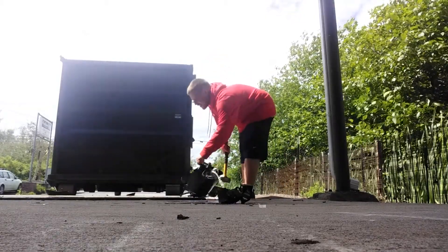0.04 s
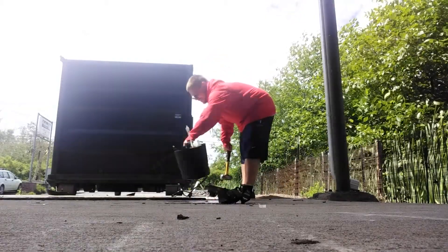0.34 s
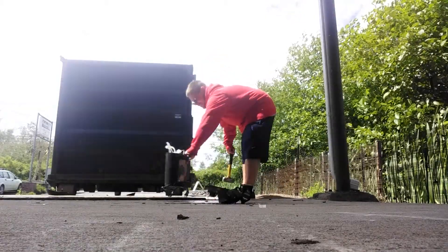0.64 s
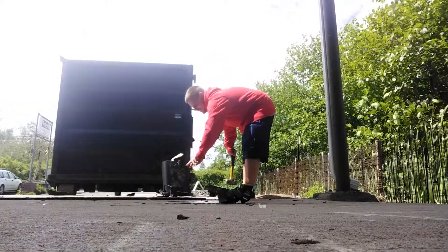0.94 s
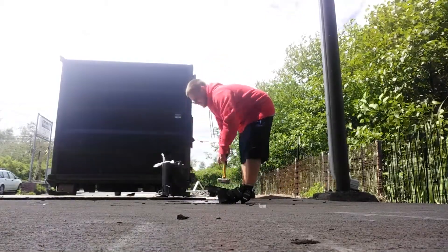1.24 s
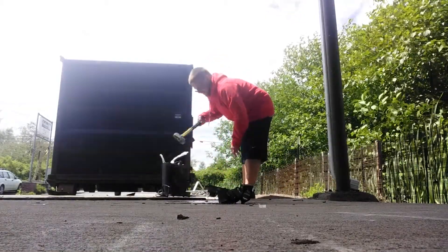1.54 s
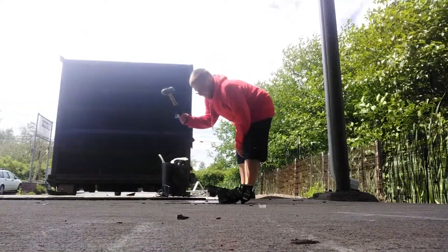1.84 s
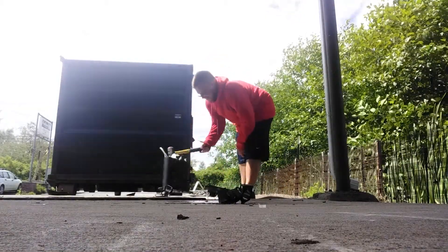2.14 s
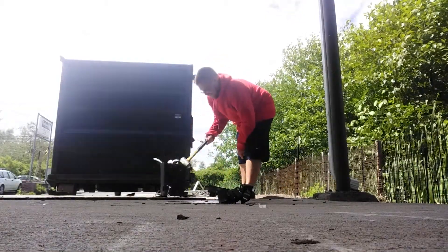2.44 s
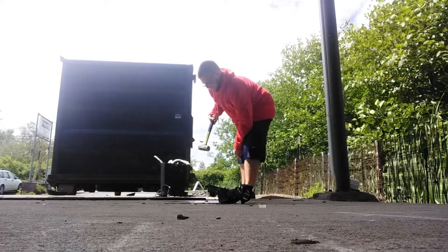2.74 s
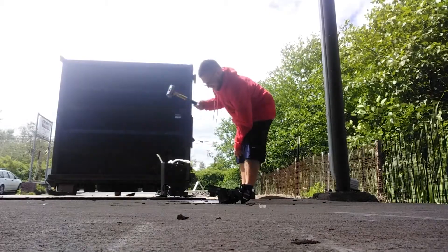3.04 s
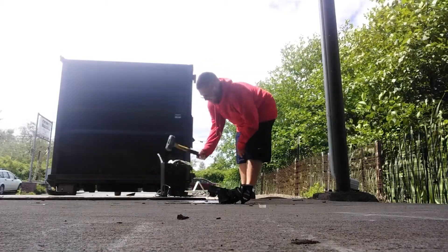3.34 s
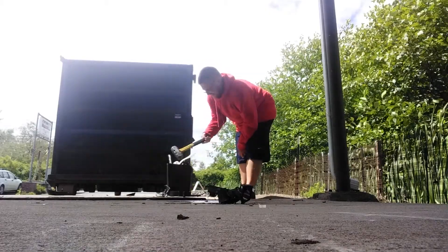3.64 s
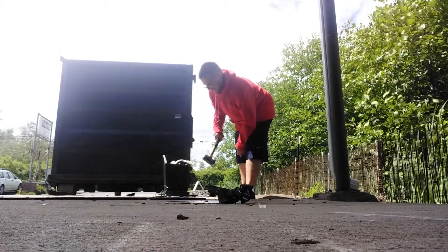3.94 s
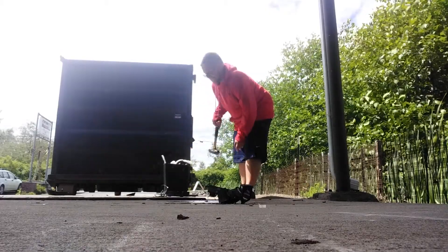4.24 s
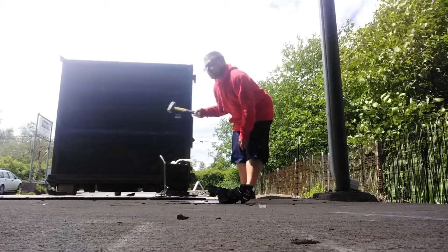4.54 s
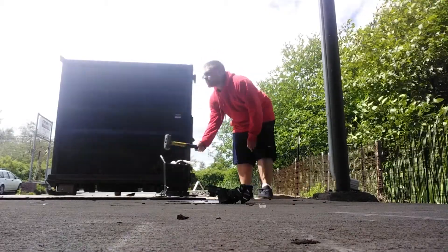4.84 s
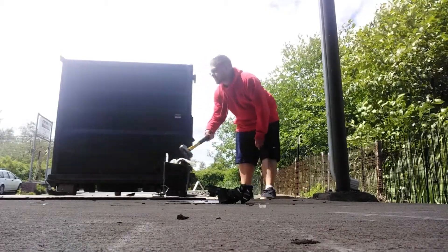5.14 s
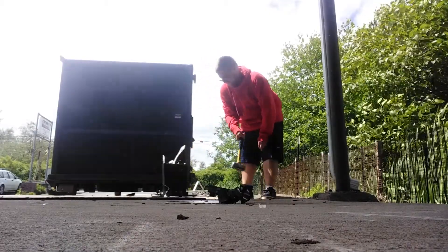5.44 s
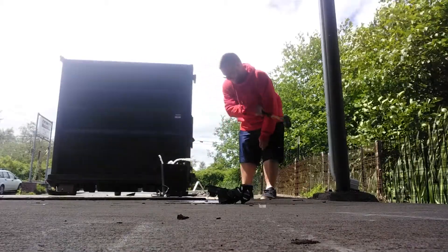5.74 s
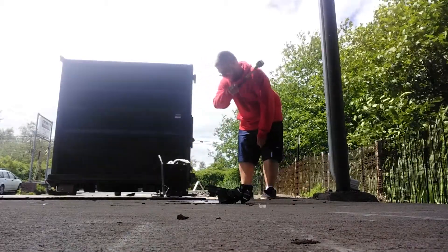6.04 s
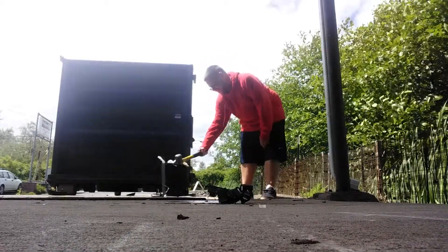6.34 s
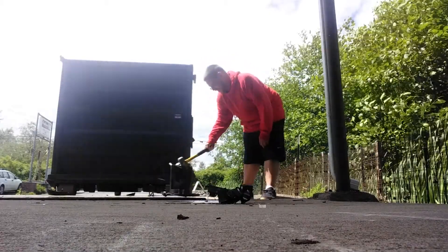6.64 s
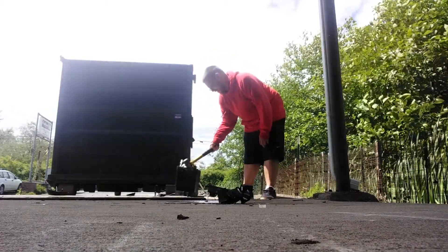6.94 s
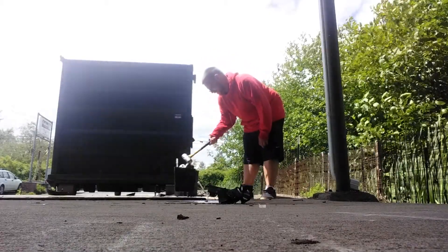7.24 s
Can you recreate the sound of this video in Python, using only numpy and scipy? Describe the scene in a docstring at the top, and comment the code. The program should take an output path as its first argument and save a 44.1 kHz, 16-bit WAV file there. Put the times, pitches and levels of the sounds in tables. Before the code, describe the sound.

Four sharp hammer blows crunch a plastic appliance outdoors, with hollow clunks and tinkling parts over the hum of passing cars.

```python
"""A plastic rattle dies away; then a coffee maker clunks down on asphalt and is tapped. Traffic rolls by.
A hammer strikes four times: the plastic shell crunches, the steel head pings and the machine thuds.
Between blows it rocks back with a hollow clunk and sheds bits; a steel skip and the yard walls echo.
Each blow turns the automatic volume down for about a second before the traffic swells back.
At the end, small parts tinkle and the machine settles as an engine draws nearer."""
import sys
import numpy as np
from scipy import signal
from scipy.fft import rfft, irfft, next_fast_len
from scipy.io import wavfile
from scipy.ndimage import uniform_filter1d, minimum_filter1d

SR = 44100
rng = np.random.default_rng(int(sys.argv[2]) if len(sys.argv) > 2 else 0)


def generate_wav(signal):
    """Clip the signal to [-1, 1] and save it as 16-bit WAV at the path in sys.argv[1]."""
    frames = np.transpose(np.atleast_2d(signal))
    scaled = np.clip(frames, -1, 1) * 32767
    pcm = np.round(scaled).astype(np.int16)
    wavfile.write(sys.argv[1], SR, pcm)


N = 329868
SIZE = 65536  # samples in one hit and its echoes
HZ = np.fft.rfftfreq(SIZE, 1 / SR)
T = np.arange(SIZE) / SR


def amp(db):
    """Turn decibels into a gain to multiply by."""
    return 10 ** (np.asarray(db) / 20)


def unit(x):
    """Scale a signal to an average (rms) strength of 1."""
    return x / np.sqrt(np.mean(x ** 2) + 1e-20)


def along(points, hz):
    """Read between (pitch_hz, value) points, spacing octaves evenly."""
    pitches, values = np.transpose(points)
    return np.interp(np.log(hz + 1), np.log(pitches + 1), values)


def add(track, start_s, x):
    """Mix one hit into the track."""
    start = max(0, round(start_s * SR))
    track[:, start:start + SIZE] += x[..., :N - start]


def filtered(x, response):
    """Scale each frequency in x by response(hz)."""
    n = x.shape[-1]
    padded = next_fast_len(n + 8192)
    return irfft(rfft(x, padded) * response(np.fft.rfftfreq(padded, 1 / SR)), padded)[..., :n]


def causal(db):
    """A filter with these levels that never sounds before the hit (minimum phase)."""
    cepstrum = irfft(db * np.log(10) / 20)
    fold_forward = np.r_[1, np.full(SIZE // 2 - 1, 2), 1, np.zeros(SIZE // 2 - 1)]
    return np.exp(rfft(cepstrum * fold_forward))


# How alike left and right sound: pitch_hz, likeness (1 = the same)
STEREO_LIKENESS = [(30, 0.8), (110, 0.97), (280, 0.9), (550, 0.55), (1100, 0.036), (2500, 0), (6000, 0)]
def diffuse(pair):
    """Blend two noises as two close microphones hear them: alike in the bass only."""
    def blend(hz):
        angle = np.arccos(np.clip(along(STEREO_LIKENESS, hz), -1, 1)) / 2
        return np.array([np.cos(angle), np.sin(angle)])
    mid, side = filtered(pair, blend)
    return np.array([mid + side, mid - side])


def rush(spectrum, patchy_db):
    """Rushing stereo noise with drifting louder and softer patches."""
    noise = signal.stft(rng.standard_normal((2, N)), nperseg=2048)[2]
    patches = uniform_filter1d(uniform_filter1d(rng.standard_normal(noise.shape[1:]), 4, 0), 10, 1)
    pair = signal.istft(noise * amp(patchy_db * unit(patches)), nperseg=2048)[1][:, :N]
    return unit(filtered(diffuse(pair), lambda hz: amp(along(spectrum, hz))))


# Cars passing behind the yard: nearest_s, half_power_after_s, roar_db, tyres_db
PASSING_CARS = [(1.45, 0.33, -32, -35), (3.301, 0.97, -36, -33.5), (5.6, 0.73, -39.5, -37.5)]
# The tone of each street noise: pitch_hz, level_db
ROAR_TONE = [(25, -34.5), (60, -11), (130, -8), (230, 2), (400, -6), (560, -6), (800, -10), (1500, -15),
             (4000, -51)]
TYRE_TONE = [(100, -33), (500, -4), (900, -1.5), (1200, 4), (1500, -10), (2500, -16.5), (6000, -51)]
HISS_TONE = [(100, -23.5), (1000, 1), (2200, 2), (3500, -4), (5000, -11), (8000, -20.5), (12000, -27.5),
             (16000, -24.5)]
ENGINE_TONE = [(25, -58), (60, -5), (95, -9.5), (116, 2.5), (140, -7), (300, -12), (700, -59)]
# How the level of the high background hiss and the engine changes: time_s, level_db
HISS_LEVELS = [(0, -50.5), (1.6, -45), (4.6, -44.5), (5.5, -39.5), (7.48, -42)]
ENGINE_LEVELS = [(0, -56.5), (1.6, -50), (3.5, -40.5), (7.48, -28.5)]
def street(far_roar_db=-44, far_tyres_db=-48):
    """Cars swell and fade over steady far traffic and a high hiss; an engine draws nearer."""
    t = np.arange(N) / SR
    nearest_s, width_s, roar_db, tyres_db = np.transpose(PASSING_CARS)
    nearness = 1 / (1 + ((t[:, None] - nearest_s) / width_s) ** 2)
    roar = np.sqrt(amp(far_roar_db) ** 2 + nearness @ amp(roar_db) ** 2)
    tyres = np.sqrt(amp(far_tyres_db) ** 2 + nearness ** 2 @ amp(tyres_db) ** 2)  # these fade sooner
    hiss = amp(np.interp(t, *np.transpose(HISS_LEVELS)))
    engine = amp(np.interp(t, *np.transpose(ENGINE_LEVELS)))
    cars = roar * rush(ROAR_TONE, patchy_db=0.5) + tyres * rush(TYRE_TONE, patchy_db=-0.5)
    return cars + hiss * rush(HISS_TONE, patchy_db=-1.5) + engine * rush(ENGINE_TONE, patchy_db=3.5)


# Whines of passing vehicles: loudest_s, pitch_hz, glide_hz_per_s, level_db
VEHICLE_WHINES = [(1.3, 569, -51.5, -41), (3.049, 494, -1, -36)]
def vehicle_whine(rounded_top_s=0.081, fade_db_per_s=17.5):
    """Fuzzy tones from passing vehicles swell, sink in pitch and fade."""
    out = np.zeros(N)
    for loudest_s, hz, glide, db in VEHICLE_WHINES:
        t = np.arange(N) / SR - loudest_s
        flutter = filtered(rng.standard_normal((2, N)), lambda f: 1 / (1 + (f / 16) ** 2))
        phase = 2 * np.pi * (hz * t + glide * t ** 2 / 2)
        fade_db = fade_db_per_s * (np.hypot(t, rounded_top_s) - rounded_top_s)
        out += amp(db - fade_db) * unit(flutter[0] * np.cos(phase) + flutter[1] * np.sin(phase))
    return out


def echo_tail(fades, build_s):
    """Scattered echoes build up, then die away at each pitch's own speed."""
    hz, t, noise = signal.stft(rng.standard_normal((2, SIZE)), SR, nperseg=256)
    fading = noise * amp(-60 * t / along(fades, hz)[:, None])
    echoes = signal.istft(fading, SR, nperseg=256)[1][:, :SIZE]
    return unit(echoes * (1 - np.exp(-T / build_s))) / np.sqrt(SIZE)


# How long echoes last: pitch_hz, fade_s (a fade_s is always the time to fall by 60 dB)
NEAR_ECHOES = [(100, 0.88), (500, 0.3), (2000, 0.34), (6000, 0.24), (14000, 0.18)]  # skip and asphalt
FAR_ECHOES = [(100, 0.63), (1000, 0.68), (4000, 0.56), (14000, 0.41)]  # yard walls and trees
def yard(echo_db, near_db=4, far_db=-13, grit_hz=1500, grit_fade_s=0.051):
    """The path through the yard: direct sound, a little later on the left, then echoes."""
    # rough asphalt mirrors the bass but scatters the treble
    grit = rfft(unit(rng.standard_normal(SIZE) * amp(-60 * T / grit_fade_s))) / np.sqrt(SIZE)
    bass = 1 / (1 + 1j * HZ / grit_hz)
    left_delay = np.exp(-2j * np.pi * HZ / SR * np.array([[1], [0]]))
    direct = (0.76 + 0.54 * bass + 1.71 * (1 - bass) * grit) * left_delay
    near = amp(near_db) * echo_tail(NEAR_ECHOES, build_s=0.0019)
    far = amp(far_db) * echo_tail(FAR_ECHOES, build_s=0.089)
    return direct + amp(echo_db) * rfft(diffuse(near + far))


def hit(force, tone, db, echo_db):
    """A force rings an object across the yard; db is the level of the first 40 ms."""
    carried = force * yard(echo_db)
    # even out the force: the object sets the tone, while snaps and echoes add the fine grain
    broad_power = uniform_filter1d(np.mean(np.abs(carried) ** 2, axis=0), size=300)
    even_out = causal(-10 * np.log10(np.abs(broad_power) + 1e-9))
    fade_out = np.clip(4 * (1.3 - T), 0, 1)
    sound = irfft(carried * even_out * tone) * fade_out
    return amp(db) * sound / np.sqrt(np.mean(sound[:, :SR // 25] ** 2))


def snaps(fade_s, per_s, contact):
    """The spectrum of a force: one contact, then a dying run of snaps of very uneven size."""
    chance, size = rng.random(SIZE), rng.standard_normal(SIZE)
    force = (chance < per_s / SR) * size * np.abs(size) ** 0.59 * amp(-60 * T / fade_s)
    force /= np.linalg.norm(force) + 1e-9
    force[0] += contact
    return rfft(force)


def ringing(notes):
    """The spectrum of a struck part: fading notes whose strengths change with every hit."""
    return rfft(sum(amp(db + rng.normal(0, 3.1) - 60 * T / fade_s) * np.sin(2 * np.pi * hz * T)
                    for hz, db, fade_s in notes))


# The bright tone of plastic chips: pitch_hz, level_db
CHIP_TONE = [(500, -34), (2000, -5), (5000, 1), (8000, -4), (13000, -1), (16000, 4)]
def patter(db, fade_s):
    """Tiny plastic bits land in a bright patter."""
    return hit(snaps(fade_s, per_s=700, contact=0.76), causal(along(CHIP_TONE, HZ)), db, echo_db=3.5)


# Ticks of chips and the cord: start_s, level_db, fade_s
CHIP_TICKS = [(0.388, -54, .1), (.458, -46, .04), (.52, -50, 0.38), (.86, -50, 0.38), (1.002, -46, .03),
              (1.608, -45.5, .05), (2.498, -44, .015), (3.504, -20.5, .015), (3.628, -27, .17),
              (5.154, -19.5, .012), (5.425, -47, .04)]
def chips():
    """Loose chips and the cord tick brightly."""
    out = np.zeros((2, N))
    for start_s, db, fade_s in CHIP_TICKS:
        add(out, start_s, patter(db, fade_s))
    return out


# Broken pieces landing: start_s, level_db
SHARD_CLICKS = [(2.289, -31), (3.504, -21), (3.707, -38), (5.07, -25.5)]
# The notes of a stiff plastic shard: pitch_hz, level_db, fade_s
SHARD_NOTES = [(3040, -2, .03), (3370, 1.5, 0.013), (3880, -8.5, 0.019), (7600, -9, 0.012)]
def shards():
    """Broken shards click on the asphalt and ring briefly."""
    out = np.zeros((2, N))
    for start_s, db in SHARD_CLICKS:
        click = snaps(fade_s=0.022, per_s=800, contact=0.61)
        add(out, start_s, hit(click, ringing(SHARD_NOTES), db, echo_db=-6))
    return out


# The notes of each metal part: pitch_hz, level_db, fade_s
ROD_NOTES = [(3820, 6, 0.034), (7600, -9, .025)]
SPRING_NOTES = [(5540, 5, 0.0057), (7250, -12, 0.013), (8100, -2, 0.015), (9450, -3, 0.023),
                (11940, 0, 0.017), (13300, 0, .008)]
PLATE_NOTES = [(1095, -7.5, 0.085), (1050, -9.5, 0.059), (1470, -4, 0.035)]
BASKET_NOTES = [(1550, -2, .028), (1890, 2, 0.016), (2210, 2, .016), (2570, -11, .02)]
# Metal parts rattling: start_s, level_db, fade_s, part (0 rod, 1 spring, 2 plate, 3 basket)
METAL_RATTLES = [(.001, -28.5, 0.51, 3), (5.172, -17, .08, 2), (5.363, -30, .05, 2), (5.524, -27.5, .06, 2),
                 (5.678, -41.5, 0.32, 0), (6.061, -50, .04, 2), (6.705, -38, 0.04, 1),
                 (6.726, -38, 0.039, 1)]
def metal_parts():
    """A loose rod, a spring clip, the warming plate and the filter basket chatter and tinkle."""
    out = np.zeros((2, N))
    for start_s, db, fade_s, part in METAL_RATTLES:
        notes = (ROD_NOTES, SPRING_NOTES, PLATE_NOTES, BASKET_NOTES)[round(part)]
        chatter = snaps(fade_s, per_s=540, contact=0.58)
        add(out, start_s, hit(chatter, ringing(notes), db, echo_db=-3))
    return out


def resonate(peaks, boost_db):
    """A filter that lifts the pitches at which an object likes to ring."""
    return 1 + sum(amp(db + boost_db) * 1j * HZ * width / (hz * hz - HZ * HZ + 1j * HZ * width)
                   for hz, width, db in peaks)


# Where the air inside the machine rings: pitch_hz, width_hz, level_db
AIR_PEAKS = [(426, 35, -3), (716.6, 18, -3.5)]
def air_inside(boom_db):
    """The air in the housing booms when a contact rocks the whole machine."""
    return resonate(AIR_PEAKS, boom_db)


# Where the plastic shell rings: pitch_hz, width_hz, level_db
SHELL_PEAKS = [(418, 190, 2), (453.5, 70, 2), (689, 45, 5.5), (887, 93, 0), (1124, 65, 4.5),
               (1372, 23, -15.5), (1586, 480, -0.5), (2070, 62, -22), (2530, 90, -8)]
# The overall tone of cracking plastic: pitch_hz, level_db
CRACK_TONE = [(25, -32.5), (55, -11.5), (120, 0), (280, 2), (570, -0.5), (1100, 3), (2000, -3),
              (3300, -7.5), (5000, -12.5), (8000, -18), (12000, -20), (16000, -18)]
def shell(bass_db, treble_db, hollow_db):
    """The tone of the plastic shell: heavy contacts push more bass, hard ones more treble."""
    tilt_db = along([(170, bass_db), (400, 0.0025), (1300, 0.028), (2900, treble_db)], HZ)
    return resonate(SHELL_PEAKS, hollow_db) * causal(along(CRACK_TONE, HZ) + tilt_db)


# Light taps on the shell: start_s, level_db, treble_db, boom_db
SHELL_TAPS = [(0.458, -48, 18, -15), (0.6607, -35.5, 9.5, -15), (1.607, -20.5, -15, 10),
              (3.5043, -9, 1, -5), (5.362, -24.5, -4.5, -3), (5.513, -31.5, 4, -15),
              (6.062, -29.5, -21, -14), (6.894, -29.5, 8, -17.5), (7.091, -18, -6, 5),
              (7.202, -17.5, 2.5, 0), (7.228, -22, -3, -14)]
def taps():
    """Light contacts knock on the shell with little bass and hardly any rattle."""
    out = np.zeros((2, N))
    for start_s, db, treble_db, boom_db in SHELL_TAPS:
        tone = shell(bass_db=-13.5, treble_db=treble_db, hollow_db=7) * air_inside(boom_db)
        knock = snaps(fade_s=0.03, per_s=1700, contact=0.39)
        add(out, start_s, hit(knock, tone, db, echo_db=-2.5))
    return out


# The opening rattle (first row), then the machine's clunks:
# start_s, level_db, bass_db, treble_db, gap_s, fade_s, boom_db, chips_db
RATTLE_AND_CLUNKS = [(.001, -26, -8, 13.5, 0.0056, 0.35, -27, -44),
                     (.696, -12.5, -0.5, 4.5, .012, 0.092, -13, -35),
                     (1.103, -33.5, 18, -6, 0.0052, 0.11, -14, -52),
                     (2.207, -7.5, -5, 3, .007, 0.044, -11.5, -41.5),
                     (3.603, -14.5, 6, 6, .005, .05, 9, -42), (5.151, -6, 8, 2.5, .006, 0.037, 2.5, -22),
                     (7.109, -10.5, -9, 5, .012, .04, -3, -48)]
def rattle_and_clunks(first_db=-3.5):
    """A plastic rattle dies away; later the machine clunks down, edge then base, shaking chips loose."""
    out = np.zeros((2, N))
    for start_s, db, bass_db, treble_db, gap_s, fade_s, boom_db, chips_db in RATTLE_AND_CLUNKS:
        tone = shell(bass_db, treble_db, hollow_db=7.5) * air_inside(boom_db)
        first = hit(snaps(fade_s=0.045, per_s=1500, contact=0.38), tone, db + first_db, echo_db=-9)
        second = hit(snaps(fade_s, per_s=1500, contact=0.5), tone, db, echo_db=-0.5)
        add(out, start_s, first)
        add(out, start_s + gap_s, second + patter(chips_db, fade_s=0.07))
    return out


# The notes a blow sets ringing: pitch_hz, level_db, fade_s
HEAD_NOTES = [(3630, -1.5, 0.019), (2686, -1, .02)]  # the steel hammer head
THUD_NOTES = [(57.6, -12, 0.17), (79.6, -1.5, 0.23), (123, -8, .15)]  # the whole machine driven onto the asphalt
# The four blows: start_s, level_db, bass_db, treble_db, shell_holds_s, fade_s, ping_db, thud_db
HAMMER_BLOWS = [(2.014, 9.5, 1, 2.5, 0.0039, 0.31, -5.5, -18.5),
                (3.343, 11.5, 0.5, 3, 0.00093, 0.23, -5.5, -14), (4.8515, 15, 1.5, 3, .004, 0.14, 1.5, -33),
                (6.2947, 9, -2, 4, 0.00035, 0.28, -1.5, -13)]
def hammer(touch_db=-11, thud_delay_s=0.022):
    """Each blow touches the shell, crunches through it, pings the steel head and thuds."""
    out = np.zeros((2, N))
    for start_s, db, bass_db, treble_db, shell_holds_s, fade_s, ping_db, thud_db in HAMMER_BLOWS:
        tone = shell(bass_db, treble_db, hollow_db=-3.5)
        touch = hit(snaps(fade_s=0.028, per_s=1500, contact=0.31), tone, db + touch_db, echo_db=7)
        crunch = hit(snaps(fade_s, per_s=750, contact=0.21), tone, db, echo_db=0)
        ping = hit(1, ringing(HEAD_NOTES), ping_db, echo_db=-19)  # a force of 1 is one clean strike
        thud = hit(1, ringing(THUD_NOTES), thud_db, echo_db=-12.5)
        add(out, start_s, touch)
        add(out, start_s + shell_holds_s, crunch + ping)
        add(out, start_s + thud_delay_s, thud)  # the shell gives way before the ground takes the load
    return out


def scene():
    """Everything that reaches the microphones, a little stronger on the right."""
    smashing = hammer() + rattle_and_clunks() + taps() + shards() + chips() + metal_parts()
    return (smashing + street() + vehicle_whine()) * amp([[-0.25], [0.25]])


def level_of(x, window_s):
    """The running level of both channels, in dB."""
    power = uniform_filter1d(np.mean(x ** 2, axis=0), int(window_s * SR) + 1)
    return 10 * np.log10(np.abs(power) + 1e-12)


def held(gain, hold_s):
    """The lowest gain of the last hold_s seconds."""
    half = int(hold_s * SR / 2)
    return minimum_filter1d(gain, 2 * half + 1, origin=half, mode="nearest")


def automatic_volume(x, threshold_db=-7, depth_db=14, hold_s=1.077, release_s=0.087):
    """A loud sound turns the volume down at once; after the hold it glides back."""
    cut_db = np.clip(threshold_db - level_of(x, window_s=0.029), -depth_db, 0)
    gain = held(amp(cut_db), hold_s)
    pole = np.exp(-1 / (release_s * SR))
    gliding = 1 + signal.lfilter([1 - pole], [1, -pole], gain - 1)
    return x * np.minimum(gain, gliding)


def limiter(x, ceiling_db=-9):
    """A fast limiter looks just ahead and flattens the top of each blow."""
    cut_db = np.minimum(ceiling_db - level_of(x, window_s=0.0097), 0)
    gain = held(amp(cut_db), hold_s=0.0055)
    return x * uniform_filter1d(minimum_filter1d(gain, size=177), size=177)


# The microphone's uneven treble: pitch_hz, gain_db
MICROPHONE_TONE = [(5800, -2), (7300, 1.5), (8600, -9.5), (10000, -8.5), (12500, -1), (15500, -7.5)]
def record(dry):
    """The microphone colours the sound, loud blows are tamed, and the lowest and highest pitches go."""
    low_cut_hz, top_hz = 47, 15950
    x = filtered(dry, lambda hz: amp(along(MICROPHONE_TONE, hz)))
    x = limiter(automatic_volume(x))
    x = x / (1 + x ** 8) ** (1 / 8)  # round off the tallest peaks
    x = signal.sosfilt(signal.butter(4, low_cut_hz, "highpass", fs=SR, output="sos"), x)
    return filtered(x, lambda hz: np.clip((top_hz - hz) / 200, 0, 1))


dry = scene()
out = record(dry)
generate_wav(out)
```